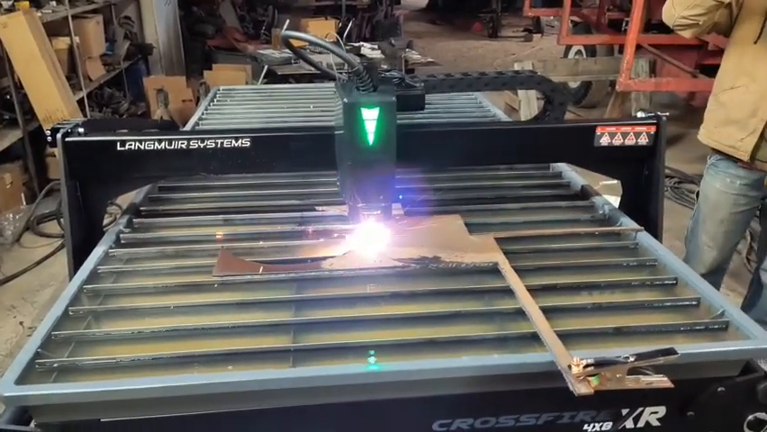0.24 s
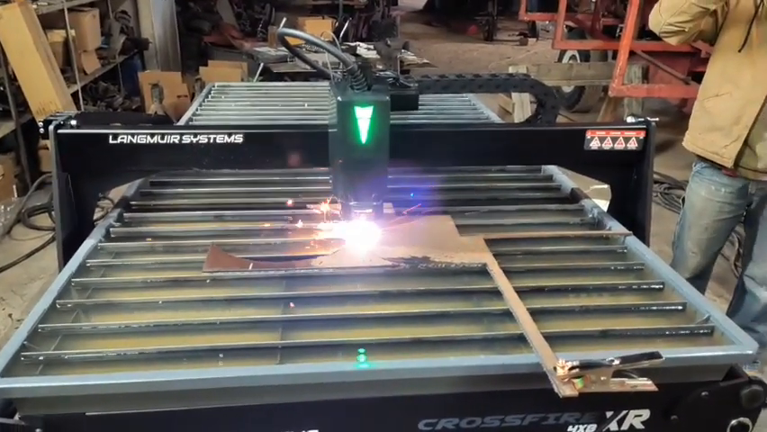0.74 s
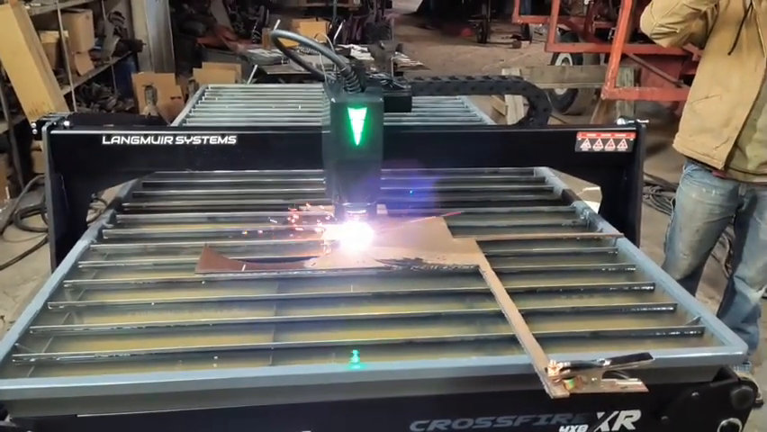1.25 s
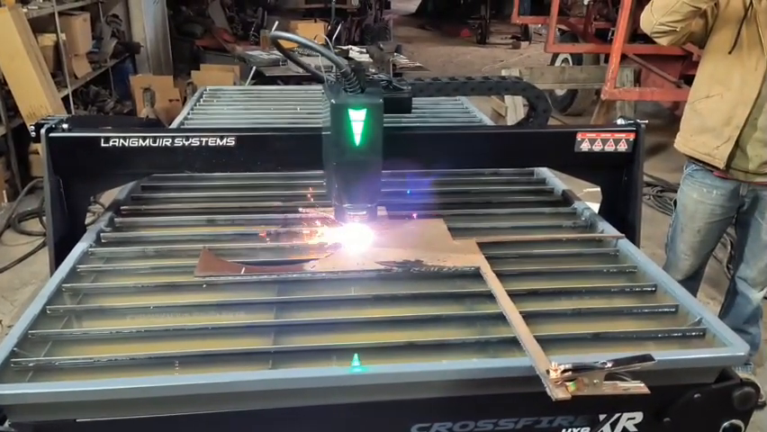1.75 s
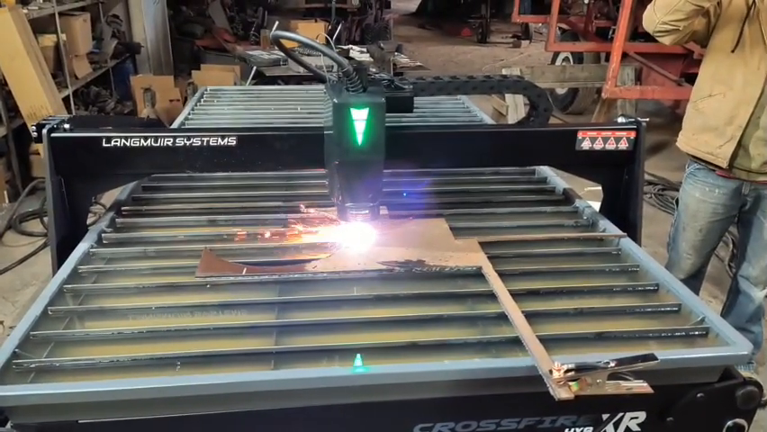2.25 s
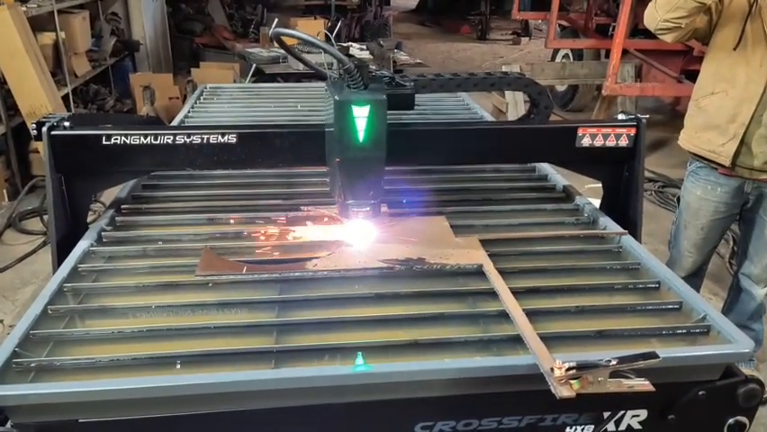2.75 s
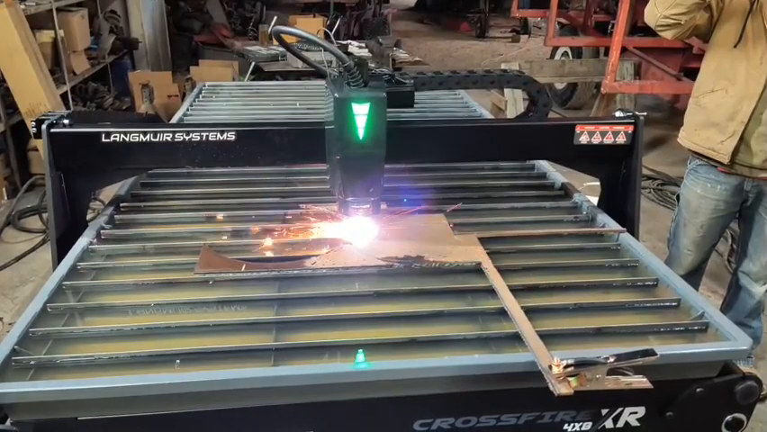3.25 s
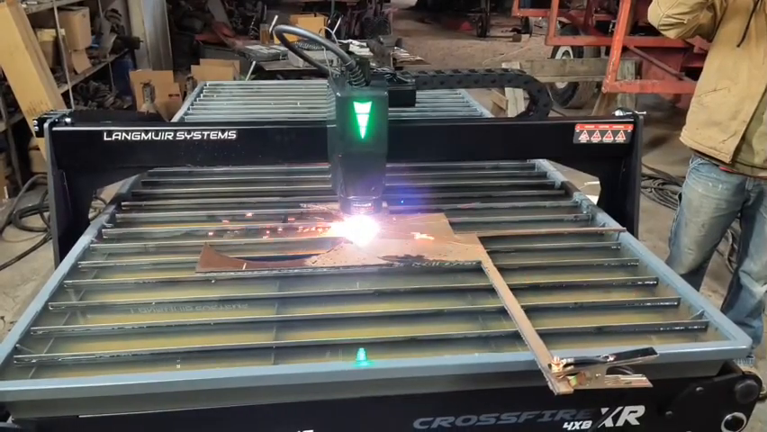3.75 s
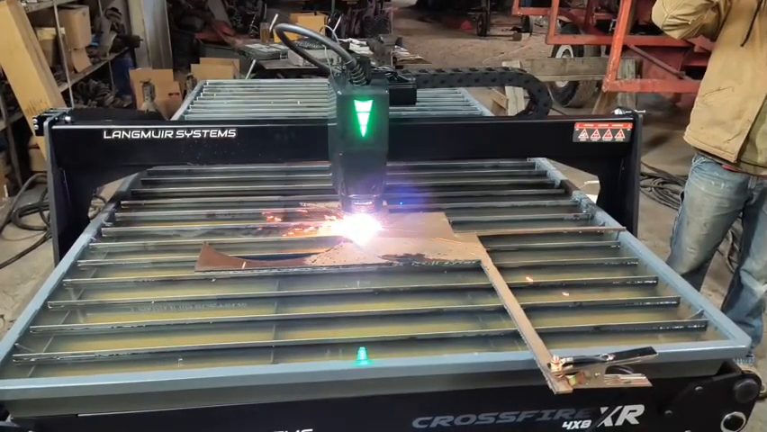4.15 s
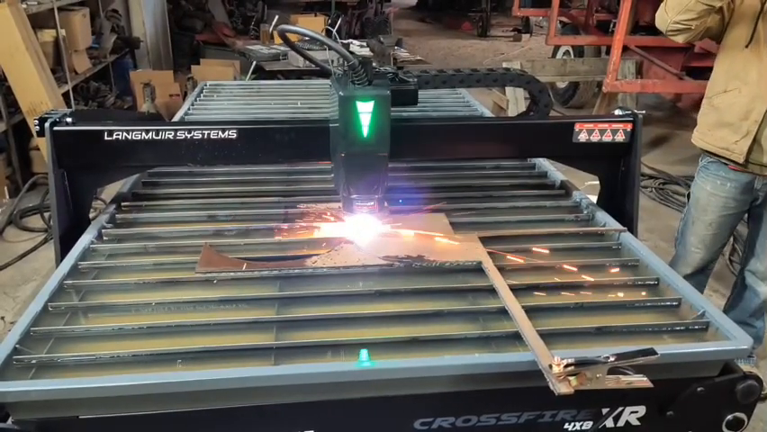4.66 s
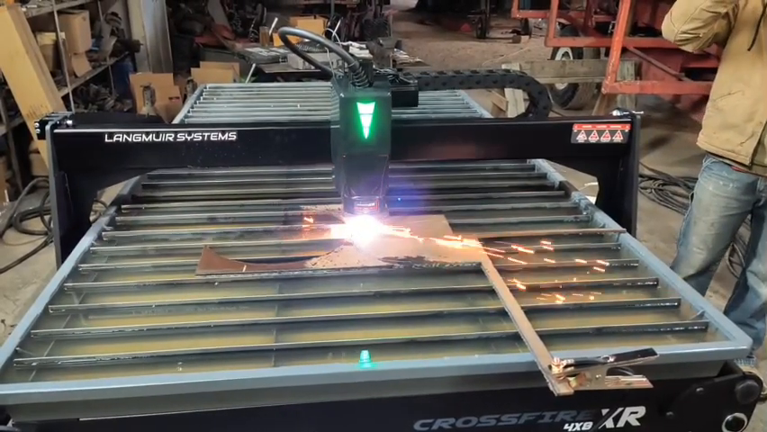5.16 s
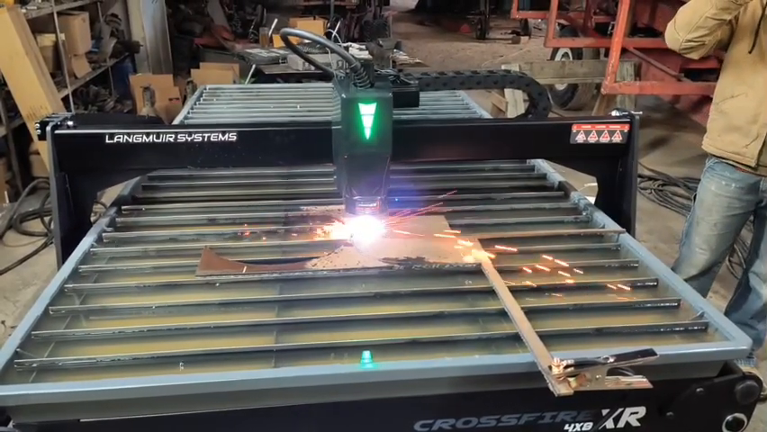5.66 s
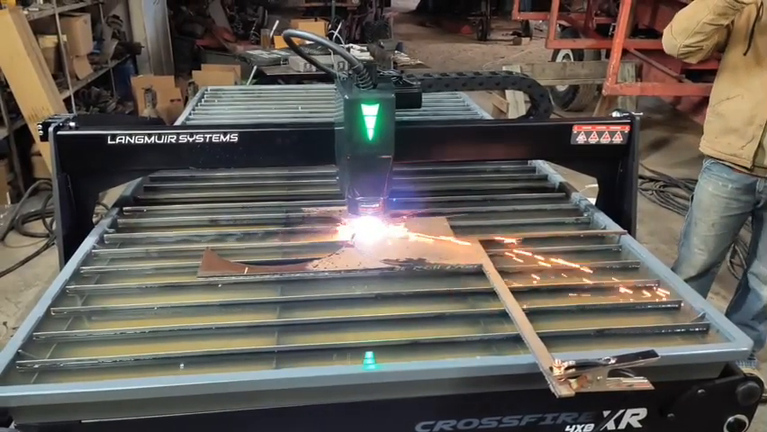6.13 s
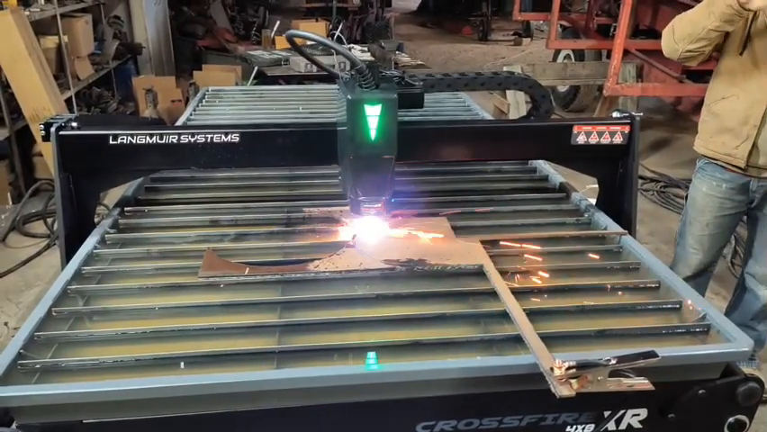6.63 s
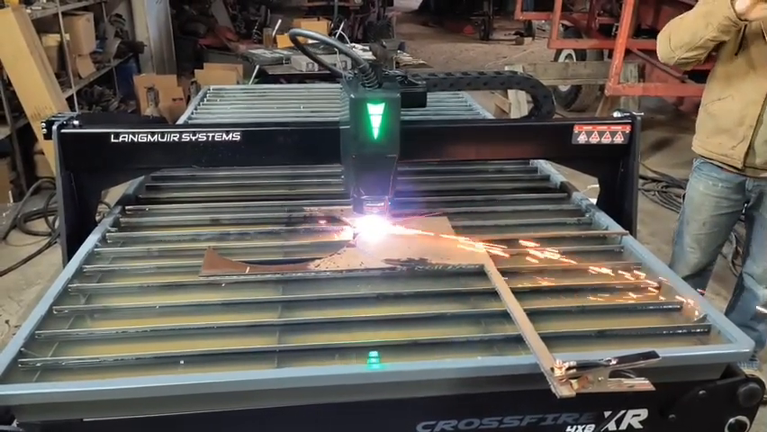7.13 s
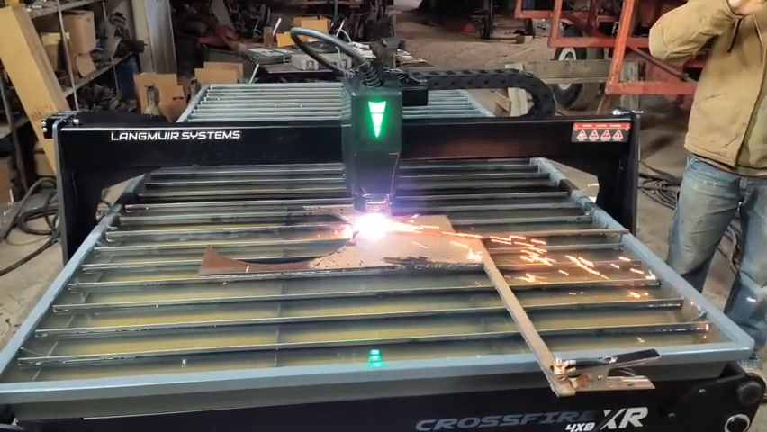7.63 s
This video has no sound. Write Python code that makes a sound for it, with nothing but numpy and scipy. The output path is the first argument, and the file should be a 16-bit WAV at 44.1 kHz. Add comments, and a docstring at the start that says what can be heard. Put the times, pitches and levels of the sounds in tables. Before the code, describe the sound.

A plasma torch cuts steel over a water tray: rough continuous hiss with watery gurgling, bubbling spray and hollow fluttering hum in a workshop.

```python
"""A plasma torch cuts steel plate laid on slats over a water tray in a workshop.
From the start the jet churns the water: a low gurgle, roughly humming air bays between the slats, and bright
patchy spray with bubble blips over an air stream, a faint rumble and faint high noise, mostly from the left.
Around half a second in, a bright whoosh swoops down, then opens upward again by the first second.
From about three to six seconds the middle bay hums less; surges and gusts go on to the end."""
import sys
import numpy as np
from scipy import signal
from scipy.fft import rfft, irfft, next_fast_len
from scipy.io import wavfile
from scipy.ndimage import uniform_filter1d, minimum_filter1d

SR = 44100
rng = np.random.default_rng(int(sys.argv[2]) if len(sys.argv) > 2 else 0)


def transcribe(signal):
    """Save signal, clipped to [-1, 1], as a 16-bit WAV file at the path in sys.argv[1]."""
    frames = np.atleast_2d(signal).T
    limited = np.clip(frames, -1, 1)
    pcm = np.round(limited * 32767).astype(np.int16)
    wavfile.write(sys.argv[1], SR, pcm)


def gain_from_db(level_db):
    """Turn a decibel level (scalar or array-like) into a linear amplitude factor."""
    decades = np.asarray(level_db, float) / 20
    return 10 ** decades


N = 347949
SIZE = next_fast_len(N, True)
HZ = np.maximum(np.arange(SIZE // 2 + 1) * SR / SIZE, 1)

# air bays between the slats: (resonance [Hz], width before sharpening [Hz])
BAYS = [(872, 144), (1035, 114), (1170, 172)]


def in_time(rows):
    """Table columns joined by straight lines, one value a sample."""
    s, *columns = np.transpose(rows)
    return [np.interp(np.arange(N) / SR, s, column) for column in columns]


def at_hz(points, hz):
    """A (frequency, value) table read on a log-frequency axis."""
    table_hz, value = np.array(points).T
    return np.interp(np.log(hz), np.log(table_hz), value)


def drift(rate):
    """Slow chance of spread 1: noise smoothed to keep what is slower than about rate [Hz]."""
    r = np.exp(-80 * np.pi * rate / SR)   # made at one value every 40 samples
    slow = signal.lfilter([1], [1, -2 * r, r * r], rng.standard_normal(N // 40 + 2002))[2000:]
    return np.interp(np.arange(N) / 40, np.arange(len(slow)), slow / slow.std())


def resonance(hz, width_hz):
    """Strength of a band-pass resonance at each frequency, 1 on top."""
    return 1 / np.sqrt(1 + ((HZ - hz * hz / HZ) / width_hz) ** 2)


def ports(hz):
    """Two microphone ports hear each frequency with their own level, phase and likeness."""
    # (frequency [Hz], left over right [dB], likeness [0-1], left leads by [rad])
    port_table = [(30, 12, .6, 0), (150, 4.5, 0.32, -0.18), (396, 4, 0.5, -0.33), (490, 0, 0.4, 0.47),
                  (775, -6, 1, 0.52), (1100, .5, 0.7, 0.79), (1440, 1.5, 0.99, 0.87),
                  (1650, 2.5, 0.3, 1.05), (1925, -1.5, 0.56, 1.46), (2250, 16.5, 0.15, 0.98),
                  (2890, 6, 0, 0.5), (3600, 7, 0, -0.9), (4160, 10, 0.73, 0.79), (4200, 9, 0, -1.5),
                  (4800, 5.5, 0.64, 0.066), (5300, 14.5, 0, 1.8), (5950, 15, 0.8, -0.26),
                  (7210, 18.5, 0.4, -1.3), (7760, 33.5, 0, 0), (9400, 36.5, .02, 0), (14150, 33, 0.1, 0),
                  (14510, 2, 0, 0), (14770, 19, 0.1, 0), (14550, 27.5, 0.15, 0)]
    at, *columns = np.transpose(port_table)
    left_right_db, alike, lead = (np.interp(np.log(hz), np.log(at), c) for c in columns)
    half = np.array([[.5], [-.5]])
    return gain_from_db(half * left_right_db) * np.exp(1j * half * lead), np.clip(alike, 0, 1)


def stereo_noise(shape):
    """Spectra of one coloured noise as the two ports receive it."""
    white = rfft(rng.standard_normal((2, SIZE)))
    pan, alike = ports(HZ)
    shared = np.sqrt(1 + alike) * white[0]
    opposed = np.sqrt(1 - alike) * white[1] * [[1], [-1]]
    return (shared + opposed) * pan * shape


def mid_one(x):
    """Scaled so that the mean of both sides has rms 1."""
    return x / np.sqrt(np.mean(x.mean(0) ** 2) + 1e-20)


def patchy(table, count, together_db, own_db, own_rate, gain=1, bump_db=None):
    """Noise split into narrow bands; each flickers partly with the others and partly alone."""
    low, high = table[0][0], table[-1][0]
    spectra = stereo_noise(gain * gain_from_db(at_hz(table, HZ)) * (HZ > low) * (HZ < high))
    place = np.log(HZ / low) / np.log(high / low) * (count - 1)
    out, together, near = 0, drift(72.0), drift(own_rate)
    for k in range(count):
        overlap = np.sqrt(np.clip(1 - abs(place - k), 0, 1)) ** 3.28
        band = irfft(spectra * overlap, SIZE)[:, :N]
        fresh = drift(own_rate)
        db = together_db * together + own_db * (fresh + 0.18 * near)   # part shared with the band below
        if bump_db:
            db = db + bump_db(low * (high / low) ** (k / (count - 1)))
        out, near = out + band * gain_from_db(db), fresh
    return mid_one(out)


def swells(bed_db, rows, edge_s, wander_db):
    """Gain of a wandering bed with (start [s], length [s], level [dB]) swells on top, soft at both edges."""
    power = gain_from_db(2 * (bed_db + wander_db * drift(7.5)))
    for s, length, db in rows:
        first, last = round((s - .1) * SR), round((s + length + .1) * SR)
        at = np.arange(max(first, 0), min(last, N))
        outside = np.maximum(abs(at / SR - s - length / 2) - length / 2 + edge_s, 0)
        power[at] += gain_from_db(2 * db) * np.exp(-(outside / edge_s) ** 2)
    return np.sqrt(power)


def churn():
    """The jet surges; each surge lifts the slosh, the gurgle or one bay, whichever is nearest in pitch."""
    # surges: (start [s], length [s], level [dB], pitch [Hz])
    surges = [(0.121, 0.15, -28, 1035), (0.14, 0.075, -37, 280), (0.29, 0.17, -22, 1035),
              (0.526, 0.14, -20, 1035), (0.603, 0.038, -34.5, 280), (1.003, 0.014, -34, 1035),
              (1.097, 0.089, -26, 1035), (1.075, 0.031, -21.0, 872), (1.08, 0.033, -20, 1170),
              (1.189, 0.038, -25.5, 620), (1.194, 0.037, -36.5, 280), (1.254, 0.043, -26.0, 620),
              (1.408, 0.047, -22.5, 620), (1.41, 0.022, -31, 1035), (1.401, 0.13, -19, 1035),
              (1.571, 0.017, -25, 1035), (1.579, 0.094, -22, 1170), (1.63, 0.045, -19, 1035),
              (1.712, 0.099, -23.5, 1035), (1.806, 0.034, -30, 280), (1.953, 0.02, -25, 1035),
              (2.033, 0.045, -23.5, 1035), (2.126, 0.046, -19.0, 872), (2.182, 0.105, -19.0, 872),
              (2.365, 0.053, -33, 280), (2.406, 0.022, -18.0, 1035), (2.408, 0.05, -21.5, 1170),
              (2.476, 0.035, -33.5, 280), (2.479, 0.045, -27.0, 620), (2.603, 0.023, -19, 1170),
              (2.642, 0.038, -36.5, 280), (2.666, 0.064, -18.5, 872), (2.669, 0.04, -32, 620),
              (2.742, 0.053, -14.5, 1170), (2.797, 0.029, -17.0, 872), (2.996, 0.048, -22, 872),
              (3.15, 0.042, -24, 1170), (3.166, 0.014, -30, 1035), (3.178, 0.045, -19, 872),
              (3.299, 0.055, -21, 872), (3.322, 0.04, -21.5, 1170), (3.535, 0.218, -25, 1170),
              (3.543, 0.086, -25, 620), (3.546, 0.1, -18.5, 1170), (3.55, 0.05, -18.5, 872),
              (3.562, 0.045, -33, 1035), (3.607, 0.14, -21.5, 872), (3.87, 0.1, -37.5, 280),
              (3.933, 0.095, -35, 620), (3.944, 0.077, -14, 872), (3.973, 0.056, -22, 1035),
              (4.01, 0.05, -30, 1170), (4.267, 0.034, -28.5, 620), (4.276, 0.062, -19.5, 872),
              (4.36, 0.048, -15, 1170), (4.372, 0.02, -17, 1035), (4.377, 0.095, -33, 620),
              (4.379, 0.051, -14.5, 872), (4.517, 0.022, -32, 1170), (4.713, 0.064, -20.5, 1035),
              (4.74, 0.065, -22.5, 1170), (4.85, 0.13, -26, 1170), (5.024, 0.06, -19, 872),
              (5.13, 0.05, -24.0, 1170), (5.169, 0.021, -15, 620), (5.2, 0.057, -13.5, 872),
              (5.224, 0.115, -25, 1170), (5.418, 0.046, -23, 872), (5.575, 0.045, -21, 1170),
              (5.584, 0.042, -20.0, 872), (5.644, 0.063, -24, 872), (5.657, 0.12, -29, 620),
              (5.658, 0.125, -19.5, 1170), (5.851, 0.07, -25, 1170), (5.859, 0.05, -22.5, 1035),
              (5.91, 0.039, -39, 280), (5.92, 0.031, -20.5, 620), (5.921, 0.034, -19, 872),
              (5.987, 0.05, -22, 872), (6.146, 0.075, -17.5, 1170), (6.304, 0.068, -35, 1170),
              (6.397, 0.039, -17, 1170), (6.399, 0.032, -26.0, 620), (6.422, 0.022, -17, 1035),
              (6.579, 0.08, -20.5, 1035), (6.605, 0.059, -41, 280), (6.615, 0.058, -21, 1170),
              (6.754, 0.075, -23.5, 872), (6.789, 0.071, -22, 1170), (6.838, 0.059, -22, 1035),
              (6.846, 0.043, -23, 872), (6.866, 0.069, -21, 620), (6.911, 0.125, -22.5, 872),
              (6.914, 0.045, -22.0, 1035), (6.919, 0.175, -25, 1170), (6.99, 0.034, -25.5, 620),
              (7.008, 0.032, -23, 1035), (7.046, 0.055, -20, 872), (7.05, 0.034, -22.5, 620),
              (7.16, 0.02, -21, 620), (7.26, 0.075, -28, 872), (7.32, 0.088, -17.5, 1170),
              (7.365, 0.032, -22.5, 620), (7.353, 0.043, -20, 872), (7.483, 0.07, -24.5, 1170),
              (7.51, 0.02, -27, 872), (7.52, 0.025, -25, 620), (7.656, 0.032, -21.5, 1170),
              (7.704, 0.03, -31, 620), (7.752, 0.064, -24, 872)]
    # levels between surges; the middle bay gives way to its neighbours as the torch moves:
    # (time [s], gurgle [dB], low bay [dB], middle bay [dB], high bay [dB])
    bed_levels = [(0.0, -34, -33.5, -26.5, -35), (0.5, -33, -37, -29.5, -50), (0.72, -43, -32, -30, -46),
                  (0.99, -31, -44, -28.5, -41), (1.21, -38.5, -24, -25, -33), (1.56, -36, -33, -46, -36),
                  (2.02, -32.5, -29, -30.5, -24), (2.55, -33, -36, -29, -37),
                  (2.9, -37.5, -26.5, -47.5, -27.5), (3.54, -33, -28.5, -46, -30),
                  (3.82, -30, -27, -43, -25.5), (4.11, -34.5, -29.5, -54, -29),
                  (6.11, -33, -24.5, -50, -26), (6.61, -32, -24.5, -34, -27), (6.92, -37, -35, -33, -32.5),
                  (7.21, -34, -25, -39, -28.5), (7.54, -34, -22, -32.5, -33),
                  (7.89, -36, -29, -39.5, -29.5)]
    # brief dips of the hum, weaker in the gurgle: (middle [s], length [s], change [dB])
    lulls = [(0.824, 0.18, -8.5), (0.993, .04, -4), (1.07, .025, -13), (1.146, .04, -6), (1.298, .04, -4.5),
             (1.387, 0.03, -5), (1.545, 0.035, -9), (2.388, .032, -9), (2.523, .11, -3), (2.662, .025, -10),
             (2.845, .03, 0), (3.392, 0.045, -8), (3.505, .03, -16), (3.832, 0.09, -12), (4.233, .056, -9),
             (4.426, 0.032, -5), (4.58, .065, -5), (4.989, .04, -11), (6.37, .037, -3.5), (6.722, 0.1, -7),
             (7.13, .03, -7)]
    slosh_hz, gurgle_hz, slosh_db = 280, 620, -43.5
    centres = np.array([slosh_hz, gurgle_hz] + [hz for hz, _ in BAYS])
    rows, t = np.array(surges), np.arange(N) / SR
    nearest = abs(np.log(rows[:, 3:] / centres)).argmin(axis=1)
    lull_db = sum(db * np.exp(-(2 * (t - s) / length) ** 2) for s, length, db in lulls)
    gurgle_db, *bay_db = in_time(bed_levels)
    beds = [slosh_db, gurgle_db + 0.36 * lull_db] + [db + lull_db for db in bay_db]
    return [swells(bed_db, rows[nearest == k, :3], edge_s=0.0065, wander_db=2.5)
            for k, bed_db in enumerate(beds)]


def shop_rumble():
    """The workshop's faint low rumble: flickering bass noise."""
    # (frequency [Hz], relative level per Hz [dB])
    shop_colour = [(20, -9), (50, -8), (75, 2), (100, -3.5), (150, 12.5), (220, -9.5)]
    return gain_from_db(-61) * patchy(shop_colour, count=4, together_db=1.7, own_db=-2.2, own_rate=4.0)


def top_noise():
    """Faint high noise above about 8 kHz, strongest near 14.4 kHz and mostly on the left."""
    # (frequency [Hz], relative level per Hz [dB])
    top_colour = [(7900, -47), (8250, -32), (8900, -24.5), (9000, -17.5), (10000, -22), (10200, -20),
                  (12400, -18), (12600, -26), (12800, -23), (14000, -7), (14350, 7.5), (14600, 4.5),
                  (14950, -11), (15700, -13), (15800, -65)]
    # (time [s], level [dB])
    top_levels = [(0, -51.5), (.9, -50), (1.3, -51.5), (2.4, -51), (3.4, -51), (7.89, -51.5)]
    noise = patchy(top_colour, count=4, together_db=-1.0, own_db=-0.2, own_rate=15.0)
    return gain_from_db(in_time(top_levels)[0]) * noise


def air_stream():
    """The steady cutting air: broad noise that flutters around one level."""
    # (frequency [Hz], relative level per Hz [dB])
    stream_colour = [(1200, -12.5), (1800, 11.5), (3000, 4), (6000, -3), (7400, -10.5), (7900, -17),
                     (8200, -38.5)]
    return gain_from_db(-39) * patchy(stream_colour, count=16, together_db=2.3, own_db=3.5, own_rate=26.0)


def slosh(gain):
    """Deep slosh of the tray water: low noise that swells with the surges."""
    # (frequency [Hz], relative level per Hz [dB])
    slosh_colour = [(90, -32), (130, -20.5), (200, -5), (300, 0), (420, 0.5), (560, -12)]
    return gain * patchy(slosh_colour, count=7, together_db=-0.15, own_db=2.0, own_rate=10.0)


def gurgle(gain):
    """Low gurgle of the churned water: quickly flickering bands of noise."""
    # (frequency [Hz], relative level per Hz [dB])
    gurgle_colour = [(330, -27), (440, -11), (500, 4), (545, -1.5), (640, 8.5), (760, 3.5), (1000, -20)]
    return gain * patchy(gurgle_colour, count=8, together_db=2.0, own_db=3.0, own_rate=21.6)


def bubbles(rows, ring_s, trim_db, widest_beat_hz):
    """Trapped air rings briefly as two close, beating tones that swell fast and die."""
    out = np.zeros((2, N))
    t = np.arange(round(.08 * SR)) / SR
    shape = (1 - np.exp(-(t / 0.0039) ** 2)) * np.exp(-t / ring_s)
    for (s, db, hz), (turn, other, apart) in zip(rows, rng.random((len(rows), 3))):
        tone = np.exp(2j * np.pi * (hz * t + turn))
        beat_hz = widest_beat_hz * (2 * apart - 1)
        tone = tone * (1 + 1.08 * np.exp(2j * np.pi * (beat_hz * t + other)))
        pan = ports(np.array([hz]))[0]
        heard = (tone * pan / abs(pan.mean())).real
        at = round(s * SR)
        out[:, at:at + len(t)] += (gain_from_db(db + trim_db) * shape * heard)[:, :N - at]
    return out


def blips():
    """Small bubbles that stand out of the spray as short high blips."""
    # (time [s], level before the trim [dB], pitch [Hz])
    blip_rows = [(0.0333, -20, 2280), (0.0812, -17.5, 2330), (0.1545, -17, 2270), (0.3541, -16, 2350),
                 (0.5598, -15.5, 3870), (0.7542, -9.5, 2330), (1.05, -18, 2240), (1.4002, -11.5, 2280),
                 (1.6851, -25, 2130), (1.9215, -21, 2260), (2.0931, -16, 4140), (2.174, -17, 2450),
                 (2.2477, -17, 2430), (2.461, -17, 2520), (2.5401, -25, 4650), (2.9088, -17, 4300),
                 (2.9974, -12, 2290), (3.214, -18.5, 4080), (3.271, -19, 2180), (3.366, -11, 2434),
                 (3.628, -17, 2290), (3.6706, -14, 2350), (4.0203, -26, 4230), (4.1949, -19, 2060),
                 (4.4972, -25, 2450), (4.577, -16.5, 2310), (4.8085, -26, 2450), (5.1083, -17, 1910),
                 (5.2918, -15, 2350), (5.3882, -12, 1920), (5.798, -21, 2420), (6.0482, -10, 1964),
                 (6.1774, -18.5, 4200), (7.2185, -20, 1860), (7.359, -23, 2270), (0.4988, -25, 5960),
                 (0.8455, -27, 5670), (1.0625, -27, 6700), (1.4576, -22, 5470), (1.5998, -26, 5300),
                 (1.8028, -22.5, 5360), (2.0537, -21, 7010), (2.3501, -27, 5300), (2.6349, -25, 5320),
                 (3.271, -23, 5500), (4.1215, -28, 5150), (4.2398, -23, 5060), (4.4498, -23, 5860),
                 (4.9931, -27.5, 5770), (5.4405, -26, 5600), (5.8232, -27, 5820), (6.2238, -25, 6020),
                 (6.5301, -24, 5170), (7.5807, -28, 5300)]
    return bubbles(blip_rows, ring_s=0.013, trim_db=-2.5, widest_beat_hz=219)


def gulps():
    """Sudden gulps of air in the bays: lower, slightly longer rings."""
    # (time [s], level before the trim [dB], pitch [Hz])
    gulp_rows = [(0.033, -14, 1012), (0.124, -11, 1008), (0.295, -1, 950), (1.035, -2.5, 1040),
                 (1.086, -4, 1120), (1.423, -21, 1050), (1.454, -27, 1060), (1.582, -6, 1060),
                 (1.631, -2, 990), (1.73, -3.5, 1080), (1.845, -11, 1090), (2.413, -8, 1036),
                 (2.497, -22, 743), (2.636, -1.5, 1138), (2.679, 0.5, 1166), (2.767, -16, 1216),
                 (2.801, -7, 908), (3.022, -6, 828), (3.081, -6, 1390), (3.178, -3, 1080),
                 (3.547, -17, 1200), (3.983, -7, 822), (4.382, -10, 1100), (4.697, -8, 820),
                 (5.134, -3.5, 863), (5.176, -2, 840), (5.223, -10, 873), (5.654, -5.5, 864),
                 (5.934, 1, 814), (6.319, -7, 1180), (6.621, -14, 1154), (6.764, -9.5, 896),
                 (6.859, 1, 795), (6.917, -6.5, 754), (7.29, -5, 825), (7.535, -3.5, 770),
                 (7.669, -15, 1154), (7.762, 1, 905)]
    return bubbles(gulp_rows, ring_s=0.015, trim_db=-8.5, widest_beat_hz=124.0)


def rings():
    """Narrow bands of the spray that ring for a while: noise that fades in, flutters and fades out."""
    # (start [s], length [s], level [dB], centre [Hz], width [Hz])
    ring_rows = [(.15, 0.35, -30, 1665, 110), (.86, 0.48, -34.5, 2590, 130),
                 (1.697, 0.18, -35.5, 2540, 130), (1.998, 0.2, -43, 2580, 130)]
    out, t = 0, np.arange(N) / SR
    for s, length, db, hz, width_hz in ring_rows:
        band = mid_one(irfft(stereo_noise(resonance(hz, width_hz) ** 2), SIZE)[:, :N])
        fade = np.exp(-(2 * (t - s) / length - 1) ** 4)
        out = out + band * gain_from_db(db + 3.4 * drift(18.0)) * fade
    return out


def spray():
    """Splash and hiss; the air pocket under the jet changes size and moves a broad bright region."""
    # between the gusts: (time [s], splash [dB], hiss [dB])
    spray_levels = [(0.0, -33.5, -35), (0.31, -31, -35), (0.59, -45.5, -36.5), (0.94, -36, -31),
                    (1.65, -31.5, -37.5), (2.02, -31.5, -33.5), (2.55, -37.5, -34.5), (3.6, -34, -34.5),
                    (3.93, -32, -34.5), (4.61, -31, -33.5), (7.43, -30.5, -33.5), (7.89, -39, -32.5)]
    # (start [s], length [s], splash [dB], hiss [dB], brightest [Hz])
    gust_rows = [(0.029, 0.094, -26.5, -39, 2140), (0.145, 0.096, -26, -43, 1900),
                 (0.285, 0.04, -28, -42, 1680), (0.349, 0.16, -24.5, -41, 1890),
                 (0.549, 0.069, -31, -31, 2480), (0.725, 0.089, -31.5, -36, 2250),
                 (0.859, 0.023, -29, -36, 2290), (0.916, 0.14, -30.5, -51, 2350),
                 (1.308, 0.033, -26.5, -34, 1610), (1.361, 0.069, -26, -33, 2180),
                 (1.8, 0.047, -27.5, -32, 2410), (1.897, 0.051, -25, -54, 1620),
                 (2.007, 0.058, -29.5, -43, 1820), (2.097, 0.127, -24.5, -37, 1820),
                 (2.242, 0.032, -20, -32, 2080), (2.327, 0.038, -25.5, -36, 1620),
                 (2.548, 0.094, -24, -55, 1490), (2.713, 0.031, -20, -30, 1800),
                 (2.899, 0.151, -24, -34.5, 1890), (3.068, 0.033, -24, -47, 1450),
                 (3.117, 0.033, -21, -33, 1720), (3.2, 0.023, -23, -42, 1600),
                 (3.263, 0.3, -23.5, -32.5, 2120), (3.602, 0.3, -24, -34.5, 1720),
                 (4.023, 0.049, -22.5, -47, 1500), (4.105, 0.165, -26.5, -35.5, 1780),
                 (4.314, 0.062, -26, -31, 1550), (4.456, 0.26, -24, -33.5, 1760),
                 (4.765, 0.086, -25.5, -39, 1610), (4.938, 0.11, -27.5, -33, 1740),
                 (5.088, 0.05, -23, -36, 1910), (5.247, 0.079, -23, -36, 1780),
                 (5.366, 0.22, -24.5, -35, 1890), (5.755, 0.093, -25.5, -34, 2010),
                 (5.873, 0.029, -22, -40, 2010), (5.979, 0.035, -23, -47, 2000),
                 (6.037, 0.066, -25.5, -29.5, 2000), (6.16, 0.057, -25, -35, 1590),
                 (6.216, 0.068, -22, -31, 1700), (6.33, 0.075, -26, -41, 1530),
                 (6.482, 0.069, -23.5, -34, 1840), (6.604, 0.21, -24.5, -34, 1840),
                 (6.992, 0.051, -21, -29.5, 1850), (7.207, 0.05, -23, -32, 1990),
                 (7.33, 0.153, -22.5, -36, 1640), (7.58, 0.089, -24.5, -34, 2030),
                 (7.795, 0.05, -18, -33, 1570)]
    # the pocket rings low, swoops down from high, then opens again: (time [s], resonance [Hz], boost [dB])
    whoosh_rows = [(0, 1650, 1.5), (.4, 1650, -2), (.44, 4200, -6.5), (.49, 5600, 8.5), (.54, 4800, 12),
                   (.59, 3200, 4), (.63, 2180, 21.5), (.68, 1490, 2), (.71, 1300, 24.5), (.74, 1600, -4),
                   (.78, 2130, 11.5), (.86, 2400, 7.5), (.92, 3760, 4.5), (1.0, 4200, 6), (1.06, 4200, 1.5)]
    # resonances of the spray: (centre [Hz], width [Hz], boost [dB])
    peak_rows = [(1528, 47, 5), (1946, 42, 5.5), (2350, 200, 1), (3870, 83, -4), (7010, 70, 4.5)]
    # both colours: (frequency [Hz], relative level per Hz [dB])
    splash_colour = [(700, -48), (1250, 6), (1500, 2), (2000, -3), (2600, -3.5), (3000, -26)]
    hiss_colour = [(2400, -19), (2800, 1.5), (4200, 3), (5000, -3), (6500, -8.5), (7500, -19.5),
                   (7900, -39), (8200, -46)]
    splash_db, hiss_db = in_time(spray_levels)
    gusts = np.array(gust_rows)
    middle_s = gusts[:, 0] + gusts[:, 1] / 2
    # the brightest region glides from gust to gust and wanders, by octaves
    bright_hz = np.interp(np.arange(N) / SR, middle_s, gusts[:, 4]) * 2 ** (0.033 * drift(4))
    whoosh_hz, whoosh_db = in_time(whoosh_rows)
    broken = drift(17.0) * np.clip(whoosh_db / 10, 0, 1)   # the swoop comes in rough bursts
    peaks = np.prod([1 + (gain_from_db(db) - 1) * resonance(hz, width) ** 2 for hz, width, db in peak_rows], axis=0)

    def pocket_db(hz):
        """Level change of one band: largest where it lies near the bright region or the whoosh."""
        steady = 4.4 * np.exp(-(np.log2(hz / bright_hz) / 0.47) ** 2)
        near_whoosh = np.exp(-(np.log2(hz / whoosh_hz) / 0.22) ** 2)
        return steady + (whoosh_db + 3.5 * broken) * near_whoosh

    splash = patchy(splash_colour, count=24, together_db=-0.14, own_db=3.5, own_rate=17.7,
                    gain=peaks, bump_db=pocket_db)
    hiss = patchy(hiss_colour, count=40, together_db=-0.7, own_db=3.5, own_rate=11.5,
                  gain=peaks, bump_db=pocket_db)
    splash_gain = swells(splash_db, gusts[:, :3], edge_s=0.023, wander_db=2.0)
    hiss_gain = swells(hiss_db, gusts[:, [0, 1, 3]], edge_s=0.023, wander_db=2.0)
    return splash_gain * splash + hiss_gain * hiss


def bays(*gains):
    """Turbulence sets each air bay between the slats humming in rough bursts."""
    out, gust = 0, drift(33.0)
    for (hz, width_hz), gain in zip(BAYS, gains):
        hum = irfft(stereo_noise(resonance(hz, width_hz) ** 2.14), SIZE)[:, :N]
        power = uniform_filter1d(np.mean(hum ** 2, axis=0), size=1800)
        hum = hum / (power + 1e-20) ** 0.26   # the jet keeps feeding the bay, so its hum seldom dies away
        out = out + gain * mid_one(hum * gain_from_db(1.37 * gust + 1.12 * drift(21.0)))
    return out


def scene():
    """All sources of the cut."""
    slosh_gain, gurgle_gain, *bay_gains = churn()
    background = shop_rumble() + top_noise() + air_stream()
    water = slosh(slosh_gain) + gurgle(gurgle_gain) + rings() + spray()
    air = blips() + gulps() + bays(*bay_gains)
    return background + water + air


def duck(x):
    """Gain control: drops quickly under loud bursts and recovers steadily, in the treble most."""
    # the followed level sinks back at a fixed pace, so a burst is remembered for a while
    above_db, fall_db_per_s, treble_from_hz = -20.5, 126.5, 1220
    treble_share, bass_share = 0.45, 0.067   # dB of gain drop for each dB too loud
    level_db = 10 * np.log10(uniform_filter1d(np.mean(x ** 2, axis=0), size=441, origin=200) + 1e-12)
    ramp = fall_db_per_s * np.arange(N) / SR
    followed_db = np.maximum.accumulate(level_db + ramp) - ramp
    over_db = uniform_filter1d(np.maximum(followed_db - above_db, 0), size=221)
    treble = irfft(rfft(x, SIZE) / (1 + (treble_from_hz / HZ) ** 6.6), SIZE)[:, :N]
    return treble * gain_from_db(-treble_share * over_db) + (x - treble) * gain_from_db(-bass_share * over_db)


def limit(x, top):
    """Gain control that looks ahead a little and eases the loudest bursts under the top."""
    room = np.minimum(1, top / (abs(x).max(0) + 1e-9))
    return x * uniform_filter1d(minimum_filter1d(room, size=401), size=401)


def top_cut(x):
    """Nothing passes above the cut-off."""
    return signal.sosfilt(signal.butter(12, 15780, fs=SR, output="sos"), x)


def record(dry):
    """The microphone cuts the deep bass, the gain drops under loud bursts and a limiter holds the peaks."""
    bass_cut = signal.butter(2, 70, "high", fs=SR, output="sos")
    heard = signal.sosfilt(bass_cut, dry)
    mix = limit(duck(heard), top=0.86)
    return top_cut(mix)


dry = scene()
out = record(dry)
transcribe(out)
```